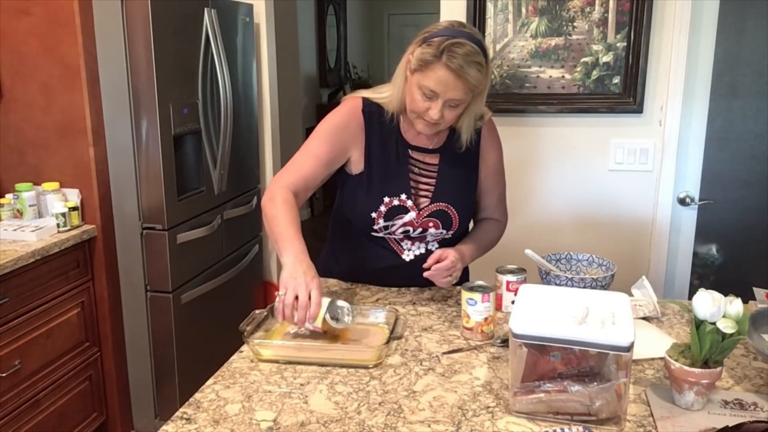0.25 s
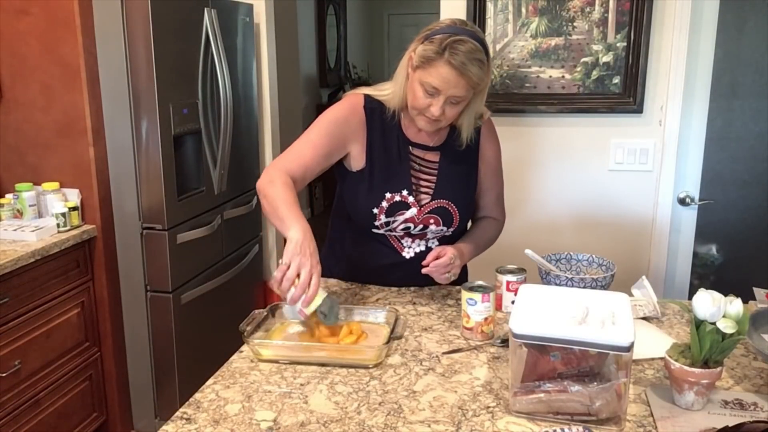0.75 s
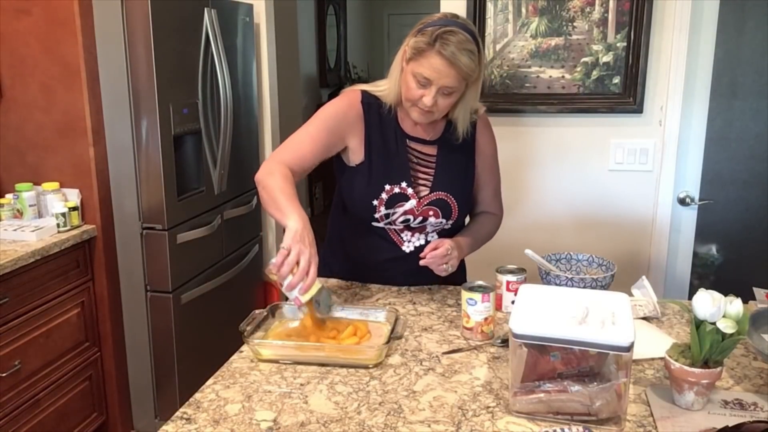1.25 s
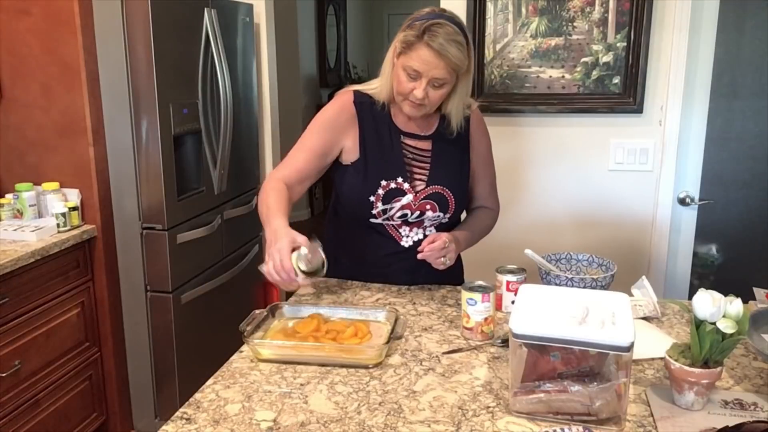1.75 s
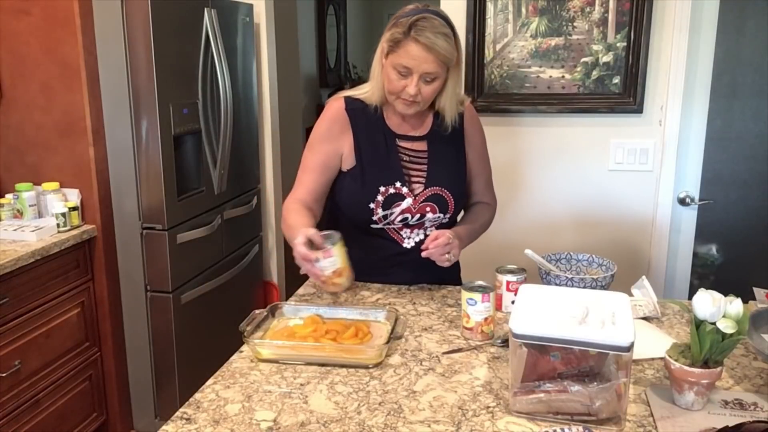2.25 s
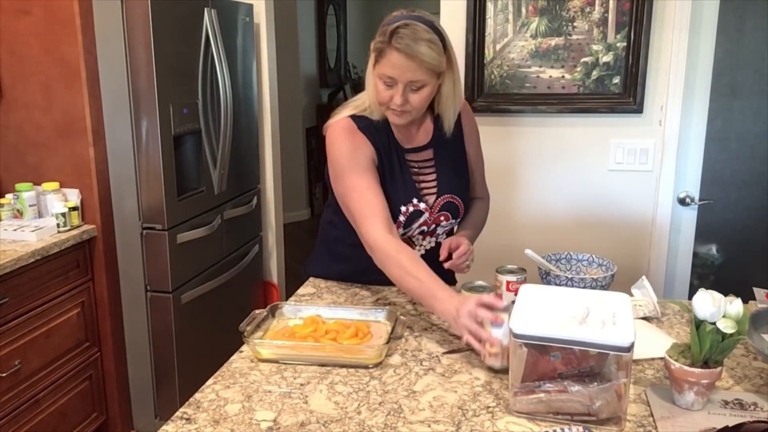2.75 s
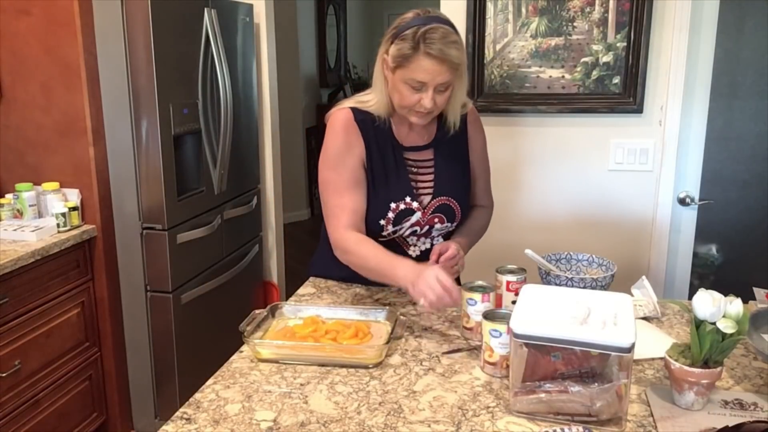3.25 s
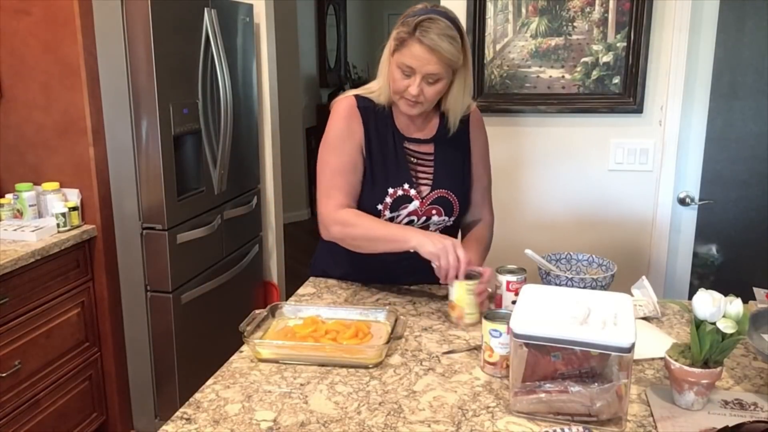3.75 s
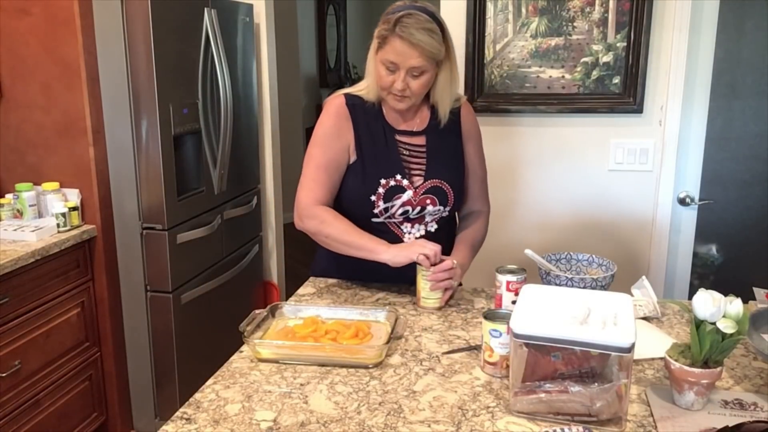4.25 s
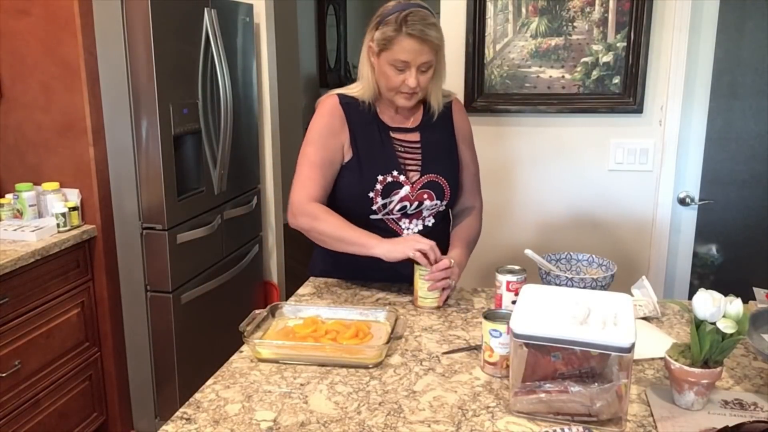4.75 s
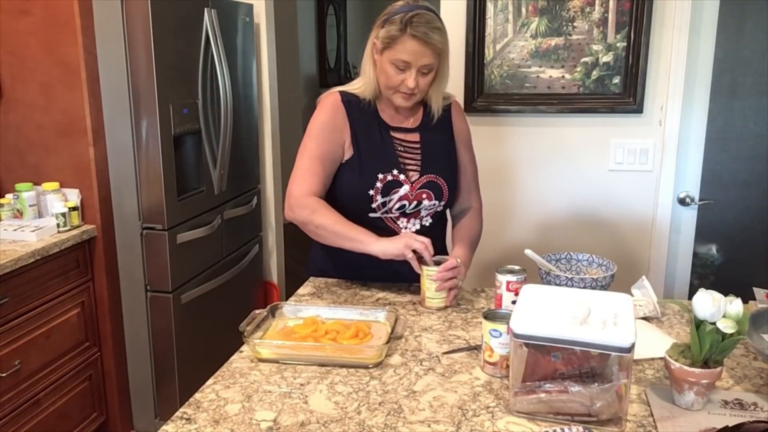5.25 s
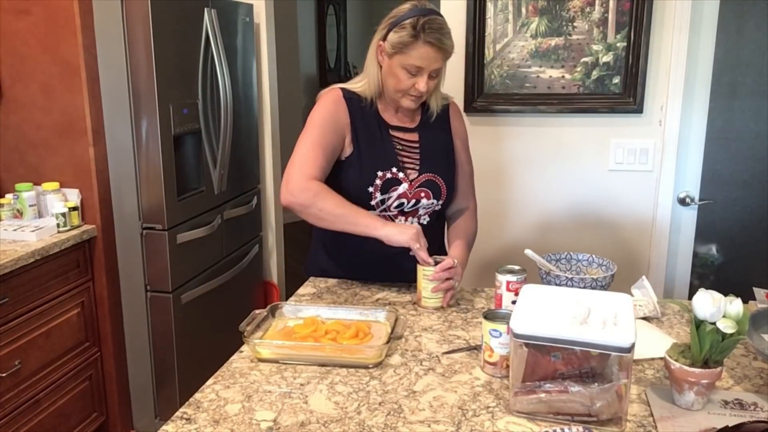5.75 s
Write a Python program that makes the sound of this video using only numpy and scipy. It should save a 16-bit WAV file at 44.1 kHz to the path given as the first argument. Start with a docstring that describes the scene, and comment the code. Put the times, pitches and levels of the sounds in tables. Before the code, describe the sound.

A lively kitchen with low ventilation and appliance hum, heard from a modest distance. From 0.1 to 1.4 s, very faint squelches and small wet plops as peach slices slide from a can into syrup in a glass dish. At about 2.1 and 2.28 s, two much louder wet slaps sound inside the can, with a hollow, mid-pitched ring and a tiny spit. A soft brush at 2.6 s, then the empty can lands on stone at 2.8 s, edge first and flat at 2.87 s, clacking with a hollow note; a thin high squeal is near 3.0 s. From 3.2 to about 5.5 s, soft even swishes come three per second, fading late. A full can knocks dully and rasps briefly around 3.7 to 3.8 s. Light metal clicks at 3.96, 4.47 and 4.75 s; the seal snaps sharply at 5.17 s. A dull bump at 5.48 s, then a rising metallic tear from 5.8 s.

```python
"""Canned peaches plop softly from a can into a glass dish; the last slices slap about inside the can.
The empty can lands on a stone counter; a full one is drawn near, its tab levered up, its seal popped, its lid peeled.
Wet and rubbing sounds are shaped noise; struck metal and stone are decaying sines; air pockets are resonances.
Soft swishes, brushes and thin squeals accompany them, in a live kitchen with a low hum."""
import sys
import numpy as np
from scipy import signal
from scipy.fft import rfft, irfft, next_fast_len
from scipy.io import wavfile
from scipy.ndimage import uniform_filter1d

SR = 44100
rng = np.random.default_rng(int(sys.argv[2]) if len(sys.argv) > 2 else 0)


def waveform_to_disk(signal):
    """Save audio, clipped to [-1, 1], as 16-bit WAV at the path in sys.argv[1]."""
    frames = np.transpose(np.atleast_2d(signal))
    scaled = np.clip(frames, -1, 1) * 32767
    samples = np.round(scaled).astype(np.int16)
    wavfile.write(sys.argv[1], SR, samples)


N = 264106
TIME = np.arange(N) / SR   # s
SHORT = TIME[:SR * 3 // 4]   # s, time axis of one event

# empty can landing on the counter: [t/s, level/dB, tilt from 0 = on its edge to 1 = flat]
KNOCKS = [(2.8004, -42, 0.48), (2.8066, -30.5, 0.089), (2.8694, -29, 0.98)]
REBOUND_S = 0.008   # each landing bounces once
# stone counter under a blow: [f/Hz, relative level/dB, t60/s]
COUNTER = [(137.4, -6.5, 0.037), (172.2, 5, 0.3), (231, 3.5, 0.13), (332, 4.5, 0.079), (455, -1.5, 0.075)]
LOADED_PITCH = 0.822   # the counter thumps lower under a full can
# spectrum of swishes, brushes and syrup spatter: [f/Hz, relative level/dB]
SWISH_COLOUR = [(400, -17), (1200, 4), (3000, 5.5), (6000, 0.5), (10000, -2), (13500, -5), (16000, -15.5)]


def from_db(db):
    """Amplitude ratio of a level in dB."""
    return 10 ** (np.asarray(db) / 20)


def rms_one(x):
    """Scale to rms 1."""
    return x / np.sqrt(np.mean(x ** 2) + 1e-20)


def at_level(x, db):
    """Scale a short sound to the energy of 10 ms at this rms level."""
    return x * from_db(db) * np.sqrt(SR / 100 / (np.sum(x ** 2) + 1e-20))


def at_hz(points, hz):
    """Interpolate a table on a log-frequency axis."""
    f, value = np.transpose(points)
    return np.interp(np.log(np.maximum(hz, 1)), np.log(f), value)


def add(track, s, x):
    """Mix a sound into the track from time s on."""
    i = max(round(s * SR), 0)
    track[i:i + len(x)] += x[:max(N - i, 0)]


def colour(x, points):
    """Causal (minimum-phase) filter with the given spectrum, by folding its cepstrum."""
    size = 2 * next_fast_len(len(x) // 2 + 2048)
    bins_hz = np.arange(size // 2 + 1) * SR / size
    cepstrum = irfft(np.log(from_db(at_hz(points, bins_hz))))
    cepstrum[1:size // 2] *= 2
    cepstrum[size // 2 + 1:] = 0
    return irfft(rfft(x, size) * np.exp(rfft(cepstrum)))[:len(x)]


def ring(modes, pitch=1):
    """Decaying sines of a struck body, alternating in sign; mode levels vary a little from blow to blow."""
    out = np.zeros(len(SHORT))
    for k, (hz, db, t60_s) in enumerate(modes):
        decay = from_db(db + rng.normal(0, 1) - 60 * SHORT / t60_s)
        out += (-1) ** k * decay * np.sin(2 * np.pi * hz * pitch * SHORT)
    return out


def grains(count, spread_db):
    """White noise of rms 1 whose size steps at random every 20 samples, about half a millisecond."""
    sizes = from_db(spread_db * np.clip(rng.standard_normal(count // 20 + 1), -2, 2))
    return rms_one(rng.standard_normal(count) * np.repeat(sizes, 20)[:count])


def swell(s, rise_s, decay_s):
    """Start time and envelope of a gesture that grows to a peak at s and dies away."""
    lead_s = min(4 * rise_s, s)
    return s - lead_s, np.exp(np.minimum((SHORT - lead_s) / rise_s, (lead_s - SHORT) / decay_s))


def resonate(x, hz, width_hz):
    """One-pole complex resonance whose centre may move; rms 1."""
    turn = np.exp(2j * np.pi * np.cumsum(hz + np.zeros(len(x))) / SR)
    pole = np.exp(-np.pi * width_hz / SR)
    return rms_one((signal.lfilter([1], [1, -pole], x / turn + 1e-18) * turn).real)


def narrow(x, hz, width_hz):
    """A resonance applied twice, for steep flanks."""
    return resonate(resonate(x, hz, width_hz), hz, width_hz)


def crack(decay_s):
    """Brief bright noise burst of a hard contact."""
    crack_spectrum = [(500, 0.5), (2000, -3.5), (5000, -0.5), (8000, -5.5), (13000, -6), (16000, 0.5)]   # [f/Hz, relative level/dB]
    return colour(rng.standard_normal(len(SHORT)) * np.exp(-SHORT / decay_s), crack_spectrum)


def hisses(rows, rise_s, spectrum, grain_db):
    """Short swells of grainy coloured noise; rows: [t/s, level/dB, decay/s]."""
    out = np.zeros(N)
    for s, db, decay_s in rows:
        start_s, force = swell(s, rise_s, decay_s)
        add(out, start_s, at_level(colour(grains(len(SHORT), grain_db) * force, spectrum), db))
    return out


def lasting(start_s, end_s):
    """True between two times."""
    return (TIME >= start_s) & (TIME <= end_s)


def stroke(peak_s, rise_db_per_s, fall_db_per_s):
    """Gain of a movement that builds to 1 at peak_s and eases off."""
    return from_db(np.minimum((TIME - peak_s) * rise_db_per_s, (peak_s - TIME) * fall_db_per_s))


def judder(depth_db, size):
    """Uneven gain of stick and slip, from noise averaged over size samples; depth is rms."""
    return from_db(depth_db * rms_one(uniform_filter1d(rng.standard_normal(N), size=size)))


def by_tilt(edge_and_flat, tilt):
    """Blend between a landing on the edge and a flat one."""
    return np.interp(tilt, [0, 1], edge_and_flat)


def room_tone(air_db=-59.0):
    """Ventilation noise, and appliance hum as narrow noise bands that waver."""
    air_spectrum = [(15, -40.5), (25, -23.5), (53, -4.5), (120, -10.5), (144, -8), (174, -4.5),
                    (276, -10.5), (361, -13), (392, -16.5), (461, -17.5), (905, -29), (2260, -31.5),
                    (6850, -39), (13400, -44.5), (15800, -50.5)]   # [f/Hz, relative level/dB]
    hum_bands = [(64, -68), (117, -63), (172, -63.5), (215, -71.5)]   # [f/Hz, level/dB]
    hum = sum(from_db(db) * narrow(rng.standard_normal(N), hz, width_hz=10.2) for hz, db in hum_bands)
    return hum + from_db(air_db) * rms_one(colour(rng.standard_normal(N), air_spectrum))


def squelches(damping=0.45, decay_s=0.055):
    """Sliding fruit squeezes out syrup: noisy spatter plus its ringing in the gap left behind."""
    # [t/s, level/dB, rise/s, gap resonance f/Hz]
    squelch_rows = [(0.126, -55.5, .005, 4240), (0.53, -54.5, 0.049, 1680), (0.899, -65, 0.0076, 5700)]
    out = np.zeros(N)
    for s, db, rise_s, hz in squelch_rows:
        start_s, force = swell(s, rise_s, decay_s)
        bursts = grains(len(SHORT), spread_db=5.5) * force
        spatter = rms_one(colour(bursts, SWISH_COLOUR))
        gap = narrow(bursts, hz, 2 * damping * hz)
        add(out, start_s, at_level(gap + spatter, db))
    return out


def plops(damping=0.18, splash_db=-11, decay_s=0.0048):
    """Each slice closes a small air pocket in the syrup, which resonates, and splashes a little."""
    # slices dropping into the dish: [t/s, level/dB, pocket resonance f/Hz]
    plop_rows = [(0.449, -62, 940), (0.522, -58.5, 664), (0.557, -62, 1850), (0.611, -62.5, 755),
                 (0.840, -57.5, 940), (0.892, -63, 3050), (0.929, -65.5, 2800), (1.260, -65.5, 680),
                 (1.312, -70, 1270), (1.347, -66, 4000), (1.365, -55.5, 3730)]
    out = np.zeros(N)
    for s, db, hz in plop_rows:
        push = np.diff(grains(len(SHORT) + 1, spread_db=3.5)) * np.exp(-SHORT / decay_s)
        pocket = narrow(push, hz, 2 * damping * hz)
        splash = from_db(splash_db) * rms_one(push)
        add(out, s, at_level(pocket + splash, db))
    return out


def spits():
    """Thin spits of syrup and air: very short, treble-heavy noise."""
    spit_rows = [(0.450, -65, .005), (1.315, -65, 0.0027), (1.875, -66.5, 0.031), (2.274, -38, 0.0015),
                 (4.196, -56.5, .003), (5.167, -36, 0.0035)]   # [t/s, level/dB, decay/s]
    spit_spectrum = [(1000, -31.5), (4500, -14), (9500, -22.5), (11500, -5.5), (14000, -9.5),
                     (16000, -13.5)]   # [f/Hz, relative level/dB]
    return hisses(spit_rows, 0.004, spit_spectrum, grain_db=6)


def squeals():
    """Thin, very high squeals: narrow noise bands that waver, swell and fade."""
    squeal_bands = [(8570, -10), (11400, 0.5), (13220, 2)]   # [f/Hz, relative level/dB]
    squeal_rows = [(0.92, -64, 0.011, 0.043), (2.99, -47, 0.05, .035)]   # [t/s, level/dB, rise/s, decay/s]
    out = np.zeros(N)
    for s, db, rise_s, decay_s in squeal_rows:
        start_s, force = swell(s, rise_s, decay_s)
        tones = sum(from_db(tone_db) * narrow(rng.standard_normal(len(SHORT)), hz, width_hz=85)
                    for hz, tone_db in squeal_bands)
        add(out, start_s, at_level(tones * force, db))
    return out


def slaps(rise_s=0.0032, column_t60_s=0.07, spray_db=-0.8, wall_db=-7.0):
    """Wet slaps: noise spray, the wall modes it rings, and a hollow decaying note of the can's air column."""
    # wet slaps inside the open can, their further air notes and a hollow echo:
    # [t/s, wall level/dB, decay/s, air column f/Hz, air column level/dB]
    slap_rows = [(2.092, -56.5, .005, 577, -53), (2.123, -29.5, .031, 628, -35.5),
                 (2.163, -60, .006, 696, -35.5), (2.166, -65, .008, 506.5, -38),
                 (2.284, -26.5, .011, 561, -28.5), (2.289, -39, 0.0089, 698, -41.5)]
    # spray on the wet wall: [f/Hz, relative level/dB]
    slap_spectrum = [(200, -24), (450, 3), (1000, -7), (1400, -2.5), (2100, -1), (2550, -2), (3200, -1.5),
                     (4300, -1), (5300, 2), (6200, -5), (7400, -5), (10000, -5.5), (12500, -3),
                     (16000, -9.5)]
    # wall modes rung by the spray: [f/Hz, width/Hz, relative level/dB]
    wall_modes = [(1160, 26, -11), (1824, 20, -3.5), (2600, 86, 3), (4140, 100, -4), (4635, 90, -17),
                  (5340, 100, 4), (6020, 163, 6), (6460, 90, 2)]
    out = np.zeros(N)
    for s, db, decay_s, hz, column_db in slap_rows:
        start_s, force = swell(s, rise_s, decay_s)
        spray = grains(len(SHORT), spread_db=2) * force
        wall = sum(from_db(mode_db) * resonate(spray, mode_hz, width_hz)
                   for mode_hz, width_hz, mode_db in wall_modes)
        add(out, start_s, at_level(colour(spray, slap_spectrum), db + spray_db))
        add(out, start_s, at_level(wall, db + wall_db))
        start_s, note = swell(s, rise_s, column_t60_s / np.log(1000))
        add(out, start_s, at_level(note * np.sin(2 * np.pi * hz * SHORT), column_db))
    return out


def brushes():
    """Short brushes of handling: soft noise swells."""
    brush_rows = [(2.575, -52.5, 0.052), (3.96, -51, 0.013), (4.50, -55, 0.016), (4.795, -57.5, .03),
                  (4.833, -53.5, .012), (5.565, -57, .025)]   # [t/s, level/dB, decay/s]
    return hisses(brush_rows, 0.0063, SWISH_COLOUR, grain_db=9.0)


def knocks(rebound_db=-13, clatter_decay_s=0.012):
    """Landings ring wall, rim and stone by tilt, rebound once, and make loose metal chatter briefly."""
    can_modes = [(1168, -2, 0.0196), (1505, 8.5, 0.017), (1613, 11.5, 0.011), (1825, -1.5, 0.066),
                 (2024, -3, 0.04), (2295, -6.5, 0.034), (2630, 0.5, 0.015), (3103, -4, 0.029),
                 (3425, -9.5, 0.077), (3840, -3.5, 0.029), (5000, -10.5, 0.0085), (5860, 0, 0.012),
                 (6160, -1.5, 0.025)]   # wall of the empty can: [f/Hz, relative level/dB, t60/s]
    rim_modes = [(801, -2.9, 0.13), (972, -0.96, 0.023), (1322, 0, 0.037)]   # clack of the rim on stone: [f/Hz, relative level/dB, t60/s]
    clatter_spectrum = [(400, -4.5), (1200, -1), (2000, 7.5), (4000, -6), (6200, 1), (7500, -30),
                        (16000, -19)]   # [f/Hz, relative level/dB]
    # levels re the landing: (on its edge, flat)/dB
    wall_db, rim_db, thump_db, clatter_db = (-16, 5), (2.5, -6.5), (-1, -10.5), (-5.5, 1)
    bodies = ((can_modes, wall_db), (rim_modes, rim_db), (COUNTER, thump_db))
    out = np.zeros(N)
    for s, level_db, tilt in KNOCKS:
        for delay_s, db in ((0, level_db), (REBOUND_S, level_db + rebound_db)):
            for modes, share_db in bodies:
                add(out, s + delay_s, at_level(ring(modes), db + by_tilt(share_db, tilt)))
            add(out, s + delay_s, at_level(crack(decay_s=0.0011), db - 0.5))
        chatter = grains(len(SHORT), spread_db=3.5) * np.exp(-SHORT / clatter_decay_s)
        clatter = colour(chatter, clatter_spectrum)
        add(out, s, at_level(clatter, level_db + by_tilt(clatter_db, tilt)))
    return out


def hollow_note(rebound_db=-4.5, lag_s=0.0016):
    """Each landing and its rebound flex the base, which sounds the air in the empty can."""
    column_modes = [(583.6, 4.5, 0.098), (688, 5.5, 0.17), (551, -6.5, 0.71), (591, -10.5, 0.5),
                    (669, -15, 0.53)]   # [f/Hz, relative level/dB, t60/s]
    column_db = (-2, 15.5)   # re the landing: (on its edge, flat)
    out = np.zeros(N)
    for s, level_db, tilt in KNOCKS:
        for delay_s, db in ((0, level_db), (REBOUND_S, level_db + rebound_db)):
            note = at_level(ring(column_modes), db + by_tilt(column_db, tilt))
            add(out, s + delay_s + lag_s, note)
    return out


def swishes(count=8, first_s=3.18, every_s=0.337):
    """An even run of soft noise swells, each opened by a light touch, the last ones fainter."""
    level_db, fades_from_s, fade_db_per_s = -48.5, 4.57, 8.5
    touch_lead_s, touch_db = 0.072, -9.5   # ahead of, and re, the swish peak
    peaks_s = first_s + every_s * np.arange(count)
    levels_db = level_db - fade_db_per_s * np.maximum(peaks_s - fades_from_s, 0)
    swells = [(s, db, 0.063) for s, db in zip(peaks_s, levels_db)]
    touches = [(s - touch_lead_s, db + touch_db, 0.024) for s, db in zip(peaks_s, levels_db)]
    swish = hisses(swells, 0.045, SWISH_COLOUR, grain_db=6.5)
    touch = hisses(touches, 0.007, SWISH_COLOUR, grain_db=4.5)
    return swish + touch


def bumps(contact_s=0.0048):
    """Syrup damps the full can, so it lands with a short dull knock and thumps the counter."""
    bump_rows = [(3.566, -66, 696, -48.5), (3.701, -52, 790, -51), (3.805, -43, 940, -46),
                 (3.815, -49.5, 1060, -64), (5.4779, -43.5, 860, -46), (5.650, -58.5, 900, -56),
                 (5.7988, -49, 686, -64)]   # [t/s, level/dB, pitch f/Hz, thump level/dB]
    bump_spectrum = [(.45, -8), (.75, 8), (1.1, 5), (1.5, 0), (2.1, 2), (2.8, -18), (4.5, -8.5), (7, -28),
                     (18, -32)]   # [multiple of the pitch, relative level/dB]
    out = np.zeros(N)
    for s, db, hz, thump_db in bump_rows:
        contact = rng.standard_normal(len(SHORT)) * np.exp(-SHORT / contact_s)
        knock = colour(contact, np.array(bump_spectrum) * [hz, 1])
        thump = ring(COUNTER, LOADED_PITCH)
        add(out, s, at_level(knock, db) + at_level(thump, thump_db))
    return out


def drag(judder_db=2.0):
    """The full can's rim rasps over the stone, speeding up then slowing; a rubbed note climbs as it nears."""
    drag_spectrum = [(300, -17), (600, -13), (780, 1.5), (880, -3), (1000, 6.5), (1200, -3), (1900, -1.5),
                     (2600, -10.5), (8000, -26)]   # rasp: [f/Hz, relative level/dB]
    start_s, fastest_s, end_s = 3.61, 3.776, 4.15
    level_db, rise_db_per_s, fall_db_per_s = -58, 36, 47
    rub_hz, rub_hz_per_s, rub_db = 905, 600, -6   # pitch at the fastest moment; level re the rasp
    speed = lasting(start_s, end_s) * stroke(fastest_s, rise_db_per_s, fall_db_per_s)
    moved_s = np.clip(TIME, start_s, end_s) - fastest_s
    friction = grains(N, spread_db=0.5) * judder(judder_db, size=500)
    rasp = rms_one(colour(friction, drag_spectrum))
    rub = from_db(rub_db) * narrow(friction, rub_hz + rub_hz_per_s * moved_s, width_hz=130)
    return from_db(level_db) * speed * (rasp + rub)


def taps(upper_ring_db=-6.5, thump_db=-60):
    """Short metal clicks and bright ticks: pitched modes, a noise crack and a faint counter thump."""
    # short clicks of tab, lid and seal, with bright ticks that open some swishes:
    # [t/s, level/dB, pitch f/Hz, crack re the level/dB]
    tap_rows = [(3.957, -52, 1064, -14), (4.445, -67, 1220, 9.5), (4.4701, -44.5, 1272, -8.5),
                (4.542, -63, 1460, 8), (4.748, -59, 1284, -15), (4.786, -62.5, 1370, 6.5),
                (5.136, -55, 1140, -16), (5.1697, -47.5, 1003, -0.5), (5.807, -56.5, 960, 6)]
    # lid and wall of the full can: [multiple of the pitch, relative level/dB, t60/s]
    low_modes, high_modes = [(.9, -0.3, 0.039), (1.15, 0.019, 0.025), (1.38, 0, .025)], [(2.75, -2, 0.0092), (3.15, -9, 0.017)]
    out = np.zeros(N)
    for s, db, hz, crack_db in tap_rows:
        add(out, s, at_level(ring(low_modes, hz), db))
        add(out, s, at_level(ring(high_modes, hz), db + upper_ring_db))
        add(out, s, at_level(crack(decay_s=0.0012), db + crack_db))
        add(out, s, at_level(ring(COUNTER, LOADED_PITCH), db + thump_db))
    return out


def seal(thump_db=-48):
    """The seal gives way in two noise snaps; the last jolts the can against the counter."""
    pop_rows = [(5.1668, -46, 0.001), (5.1693, -40, 0.0011)]   # [t/s, level/dB, decay/s]
    pop_spectrum = [(120, 8.5), (500, -15), (820, 9.5), (1150, -1), (1450, 1.5), (2100, -3), (3300, -8.5),
                    (4400, -1.5), (6500, -0.5), (9500, -4.5), (12500, -20), (16000, -3)]   # [f/Hz, relative level/dB]
    out = hisses(pop_rows, 0.0004, pop_spectrum, grain_db=4)
    add(out, pop_rows[-1][0], at_level(ring(COUNTER, LOADED_PITCH), thump_db))
    return out


def peel(tear_db=-6, lid_db=-8, judder_db=1.6):
    """The score line tears as uneven noise; gap and lid resonances climb as one widens and the other curls."""
    tear_spectrum = [(300, -6), (1000, 6), (4300, 5), (7000, -7), (10000, -10), (16000, -13)]   # [f/Hz, relative level/dB]
    start_s, runs_s = 5.81, 5.903   # the pull builds until the metal runs, then eases
    level_db, rise_db_per_s, ease_db_per_s = -41, 205, 50
    gap_hz, gap_hz_per_s = 750, 5300
    lid_hz, lid_hz_per_s = 2880, 3100
    pull = (TIME >= start_s) * stroke(runs_s, rise_db_per_s, ease_db_per_s)
    open_s = np.maximum(TIME - start_s, 0)
    snaps = grains(N, spread_db=2.0) * judder(judder_db, size=220)
    gap = narrow(snaps, gap_hz + gap_hz_per_s * open_s, width_hz=470)
    lid = from_db(lid_db) * narrow(snaps, lid_hz + lid_hz_per_s * open_s, width_hz=420)
    tear = from_db(tear_db) * rms_one(colour(snaps, tear_spectrum))
    return from_db(level_db) * pull * (gap + lid + tear)


def echoes(x):
    """Two distinct, duller reflections, off the ceiling and a far wall."""
    echo_rows = [(.0088, -6), (.0405, -14)]   # [delay/s, level/dB]
    echo_spectrum = [(300, -1), (650, 6.5), (1500, -6.5), (6000, -14.5), (16000, -26)]   # [f/Hz, gain/dB]
    out, dull = np.zeros(N), colour(x, echo_spectrum)
    for delay_s, db in echo_rows:
        add(out, delay_s, from_db(db) * dull)
    return out


def kitchen(x, first_s=0.0033, build_s=0.00067):
    """Dense reflections build up within milliseconds and die away band by band."""
    room_t60 = [(100, 0.16), (600, 0.65), (2000, 0.69), (5000, 0.56), (9000, 0.47), (15000, 0.2)]   # [f/Hz, t60/s]
    edges_hz = np.geomspace(60, 18000, 13)
    white = rng.standard_normal((2, len(SHORT)))
    build_up = 1 - np.exp(-np.maximum(SHORT - first_s, 0) / build_s)
    tail = np.zeros(len(SHORT))
    for k, (low, high) in enumerate(zip(edges_hz, edges_hz[1:])):
        bandpass = signal.butter(2, [low, high], "band", fs=SR, output="sos")
        band = signal.sosfilt(bandpass, white[k % 2])   # neighbours use different noise
        t60_s = at_hz(room_t60, np.sqrt(low * high))
        band = band * from_db(-60 * SHORT / t60_s) * build_up
        tail += band * np.sqrt(2 * (high - low) / SR / np.sum(band ** 2))   # energy by bandwidth
    return signal.fftconvolve(x, tail)[:N]


def scene():
    """Sum the direct sources, their echoes and reverberation, and the room tone."""
    # (source, reverb send/dB)
    sources = [
        (plops() + squelches(), -3.0),
        (spits(), -3.5),
        (squeals(), -2),
        (slaps(), -2.5),
        (knocks(), -2.0),
        (hollow_note(), -7),
        (swishes() + brushes(), -0.5),
        (taps() + bumps(), 0.4),
        (drag() + peel(), -1.5),
        (seal(), 4.0),
    ]
    direct = sum(x for x, send_db in sources)
    send = sum(x * from_db(send_db) for x, send_db in sources)
    return (direct + echoes(direct) + kitchen(send) + room_tone())[None]


def record(dry):
    """The microphone drops the deepest bass; the top is cut steeply."""
    high_pass = signal.butter(4, 44, "high", fs=SR, output="sos")
    low_pass = signal.ellip(12, 0.2, 80, 15830, fs=SR, output="sos")
    return signal.sosfilt(low_pass, signal.sosfilt(high_pass, dry))


dry = scene()
out = record(dry)
waveform_to_disk(out)
```